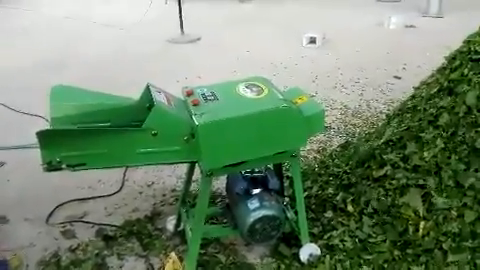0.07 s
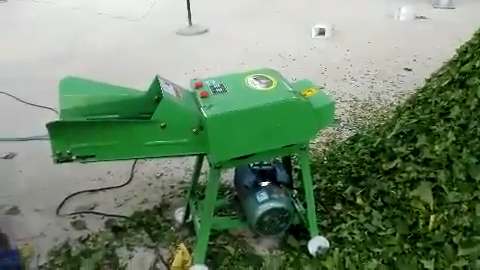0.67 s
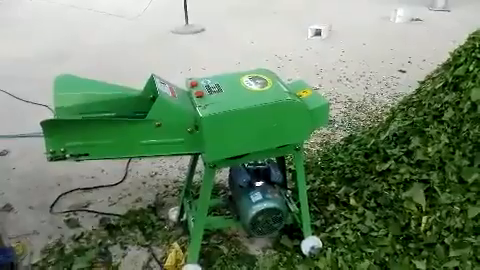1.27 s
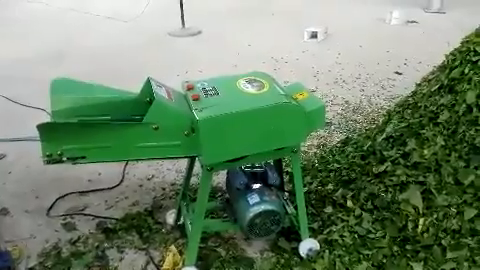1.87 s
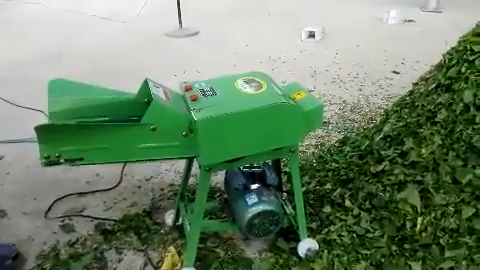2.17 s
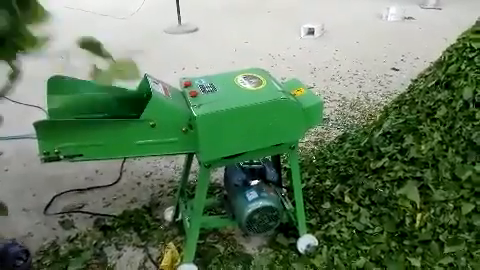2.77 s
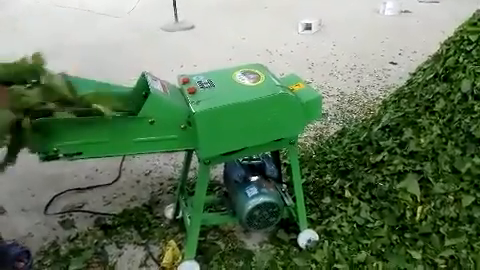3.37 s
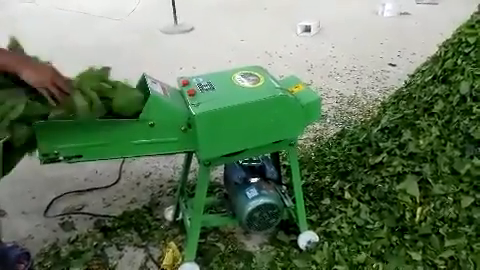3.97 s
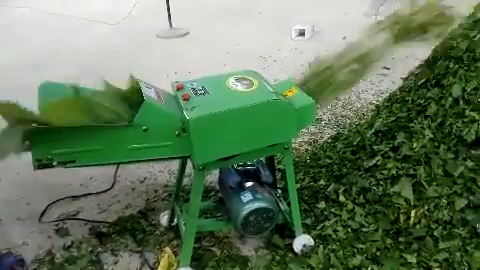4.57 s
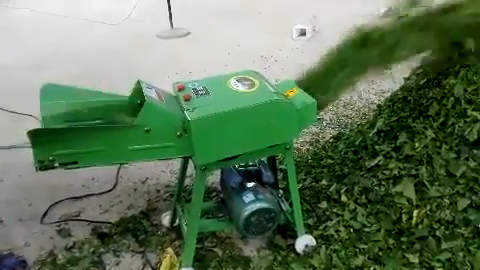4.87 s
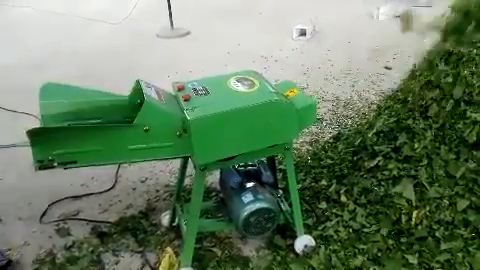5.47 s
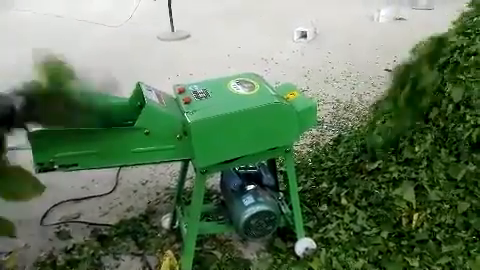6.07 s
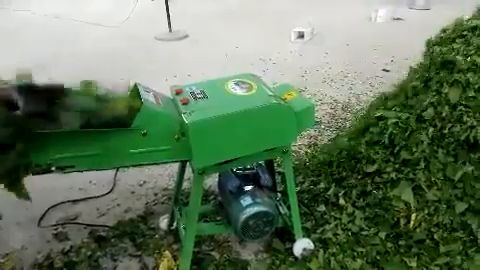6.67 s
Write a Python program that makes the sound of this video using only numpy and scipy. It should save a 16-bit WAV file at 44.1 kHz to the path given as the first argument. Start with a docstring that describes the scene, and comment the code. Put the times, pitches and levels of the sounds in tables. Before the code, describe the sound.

An electric chaff cutter drones and rattles, surging as it shreds leaves, chops hard stalks and sprays out the pieces.

```python
"""An electric chaff cutter runs in a concrete yard: its three-armed rotor drones, the motor hums and the
housing rattles. From 1.3 s leaves are shredded and sprayed out of the spout, and two wads thump through.
At 4.1 s hard stalks scrape in; the knives slow as they chop, then pick up speed while thick stems knock
on the bed plate. More leaves follow, and a second bundle of stalks bites at 6.5 s.
A small recorder stands close by; its right channel is muffled."""
import sys
import numpy as np
from scipy import signal
from scipy.fft import rfft, irfft, next_fast_len
from scipy.io import wavfile
from scipy.ndimage import map_coordinates

SR = 44100
rng = np.random.default_rng(int(sys.argv[2]) if len(sys.argv) > 2 else 0)


def generate_wav(signal):
    """Clip the signal to [-1, 1] and save it as 16-bit WAV at the path in sys.argv[1]."""
    frames = np.transpose(np.atleast_2d(signal))
    scaled = np.clip(frames, -1, 1) * 32767
    pcm = np.round(scaled).astype(np.int16)
    wavfile.write(sys.argv[1], SR, pcm)


N = 295911

# Resonances of the sheet steel housing. Each row: pitch in Hz, width in Hz, relative level in dB.
HOUSING_MODES = [(396, 83, 2.5), (775, 264, -1.5), (975, 170, -5.5), (1336, 42, 2), (1580, 330, -2.5),
                 (2228, 99, -3.5), (2430, 170, -7), (3500, 810, -13.5), (4640, 400, -15.5)]
# Resonances of the knives and bed plate. Each row: pitch in Hz, width in Hz, relative level in dB.
STEEL_MODES = [(686, 23, -10), (945, 59, -2.5), (1043.6, 29, 4), (1236, 33, -0.5), (2234, 31, -0.5),
               (2490, 60, -4), (2957, 38, -7), (3410, 67, -22), (3776, 130, -10.5), (4520, 210, -11.5)]
# Bundles of hard stalks. Each row: start and length in seconds, then ring, thud and scrape levels in dB.
STALK_BUNDLES = [(4.127, 1.006, -18.5, -18, -25.5), (6.505, .6, -20, -24, -32)]


def amp(db):
    """Decibels to gain."""
    return 10 ** (np.asarray(db) / 20)


def unit(x):
    """Scale to rms 1."""
    return x / np.sqrt(np.mean(x ** 2) + 1e-20)


def since(start):
    """Seconds since a moment, per sample."""
    return np.arange(N) / SR - start


def curve(rows):
    """An automation line through (seconds, value) points."""
    return np.interp(since(0), *np.transpose(rows))


def wobble(rate):
    """A smooth random curve, rate knots a second."""
    coarse = np.arange(0, N + 64, 64)
    knots = rng.standard_normal(int(N * rate / SR) + 4)
    return np.interp(np.arange(N), coarse, map_coordinates(knots, [coarse * rate / SR]))


def grains(rate, spread_db):
    """Tiny impacts of uneven size at random moments, rate a second."""
    hit = rng.random(N) < rate / SR
    return unit(hit * rng.choice([-1, 1], N) * amp(spread_db * np.clip(rng.standard_normal(N), -2, 2)))


def filtered(x, response):
    """x through a complex frequency response."""
    size = next_fast_len(N + SR // 2)
    return irfft(rfft(x, size) * response(np.fft.rfftfreq(size, 1 / SR)), size)[..., :N]


def coloured(x, points):
    """x through an EQ curve of (Hz, dB) points, at rms 1."""
    points_hz, db = np.transpose(points)
    return unit(filtered(x, lambda hz: amp(np.interp(np.log(hz + 1), np.log(points_hz), db))))


def ringing(force, modes):
    """A force through (Hz, width in Hz, dB) resonances of alternating polarity, at rms 1."""
    def response(hz):
        return sum((-1) ** k * amp(db) * 1j * hz * width / (pitch ** 2 - hz ** 2 + 1j * hz * width)
                   for k, (pitch, width, db) in enumerate(modes))
    return unit(filtered(force, response))


def surge(start, db, rise_s, hold_s, fade_db_per_s, bite_db):
    """Gain of a load that catches in 14 ms, builds from bite_db below its peak, holds and fades."""
    t = since(start)
    build_db = -bite_db * np.clip(1 - t / rise_s, 0, 1)
    fade_db = -fade_db_per_s * np.maximum(t - rise_s - hold_s, 0)
    return np.clip(t / .014, 0, 1) * amp(db + build_db + fade_db)


def drone(leaves, stalks, wad):
    """Three arms beat the air, harder under load; the motor's hum beats against the rotor's tones."""
    # The rotor labours a little on the wads. Each row: time in seconds, turns a second.
    rotor_speed = [(0, 52.9), (1.25, 52.8), (1.6, 51.9), (1.8, 52.4), (2.1, 52.8), (2.8, 53.15),
                   (4.7, 53.15), (5.4, 52.9), (5.7, 52.6), (6.3, 52.7), (6.71, 52.5)]
    # The arm tone swells, then beats slowly. Each row: time in seconds, level in dB.
    arm_levels = [(0, -39), (1.75, -40), (2.3, -36), (2.6, -34.5), (4.5, -33), (5.38, -34.5), (5.63, -42),
                  (5.83, -36), (6.01, -45), (6.29, -36), (6.54, -43), (6.71, -35)]
    # The casing's low boom swells and ebbs. Each row: time in seconds, level change in dB.
    boom_levels = [(0, -8.5), (1.1, -11), (1.8, -3), (2.9, 1), (4, -1.5), (5.1, -4.5), (5.6, -12.5),
                   (6.2, -5), (6.71, -10.5)]
    # A thin whine fades early on. Each row: time in seconds, level in dB.
    whine_levels = [(0, -39), (.75, -39), (1.05, -49), (6.71, -45.5)]
    # The rotor's weaker tones. Each row: multiple of the turn rate, base level in dB.
    overtones = [(1, -64), (2, -51), (4, -56.5), (5, -44.5), (7, -45.5), (9, -49.5), (11, -71), (18, -46),
                 (20, -46)]
    # The motor's magnetic hum. Each row: pitch in Hz, base level in dB, dB gained per dB of boom.
    hum_tones = [(102.8, -49, 0.8), (209.2, -48.5, 0.2), (270, -41, 1.1)]
    arm_db, boom_db, whine_db = curve(arm_levels), curve(boom_levels), curve(whine_levels)
    angle = 2 * np.pi * np.cumsum(curve(rotor_speed)) / SR

    def tone(phase, db):
        return np.sqrt(2) * amp(db) * np.sin(phase + rng.uniform(0, 2 * np.pi))

    def shaft(order, db, load=0):
        return np.hypot(amp(db), load) * tone(order * angle, 0)

    arms = shaft(order=3, db=arm_db, load=amp(-2.5) * wad)
    arms += shaft(order=6, db=-31 + 1.13 * boom_db, load=amp(5.5) * wad + amp(-12) * stalks)
    eighth_db = -35 + .52 * (whine_db - whine_db.mean())
    whine = shaft(order=8, db=eighth_db, load=amp(-22.5) * stalks + amp(-15.5) * leaves)
    whine += shaft(order=12, db=whine_db)
    # only the low overtones share the casing's boom
    weak = sum(tone(order * angle + .31 * wobble(7), db + .31 * boom_db * (order < 8) + .77 * wobble(12))
               for order, db in overtones)
    hum = sum(tone(2 * np.pi * hz * since(0) + .16 * wobble(2.2), db + share * boom_db)
              for hz, db, share in hum_tones)
    # The casing's low air resonances. Each row: pitch in Hz, width in Hz, relative level in dB.
    cavity_modes = [(258, 53, 7), (383, 86, 10.5)]
    turbulence = amp(boom_db - 35) * ringing(rng.standard_normal(N), cavity_modes)
    return arms + amp(1.9 * wobble(6.8)) * whine + weak + hum + turbulence


def knife_passes():
    """Running count of knife passes."""
    # The drum slows under load, then recovers. Each row: time in seconds, cuts a second.
    cut_rate = [(0, 79.2), (4.1, 79), (4.3, 75.4), (4.5, 75), (4.75, 76.2), (5.1, 78.5), (6.71, 78.5)]
    return np.cumsum(curve(cut_rate)) / SR


def running_noise():
    """Air rushes and loose panels rattle; a dry rub swells once in each turn of the four-knife drum."""
    # Air rushing round the empty rotor. Each row: frequency in Hz, relative level in dB.
    air_eq = [(25, -33), (70, -22.5), (130, -12.5), (220, -11.5), (370, -1), (520, -3), (900, 1),
              (1500, -5.5), (1900, -9.5), (4400, -14.5), (5300, -16), (7000, -30), (10200, -26),
              (13000, -28)]
    # The drum's dry rasp. Each row: pitch in Hz, width in Hz, relative level in dB.
    rasp_modes = [(2340, 56, -14), (2880, 690, -5), (3770, 370, 1), (4440, 300, 0.5), (5500, 610, -8.5),
                  (6270, 510, -4), (7244, 270, -5.5), (10080, 240, -14), (12800, 2000, -30)]
    air = amp(-28.5 + .15 * wobble(15)) * coloured(grains(rate=9000, spread_db=1), air_eq)
    rattle = amp(-34 + .44 * wobble(9.2)) * ringing(grains(rate=700, spread_db=6), HOUSING_MODES)
    cut_phase = 2 * np.pi * knife_passes()
    swell = amp(-3.2 * signal.sawtooth(cut_phase / 4) + np.cos(cut_phase))  # catches fast, eases off
    rub = amp(-35) * ringing(swell * rng.standard_normal(N), rasp_modes)
    return air + rattle + rub


def leaf_load():
    """Gains of tearing and spray as leaves reach the rotor; the fullest bunch sets each."""
    # Bunches of leaves. Each row: start and rise in seconds, tear and spray levels in dB,
    # tear and spray fades in dB a second.
    bunches = [(1.302, 0.042, -22, -29, 16, 59), (1.485, 0.12, -17, -22.5, 27.5, 68),
               (2.08, 0.12, -23, -34, 28.5, 48), (4.111, 0.16, -19, -24.5, 15, 27),
               (4.9, 0.073, -23, -30.5, 26, 23), (5.35, 0.13, -23.5, -27, 27, 53),
               (5.84, 0.092, -25, -27, 23, 43), (6.32, 0.074, -25.3, -31.5, 28, 41),
               (6.52, 0.1, -20, -26, 21, 40)]
    spout_delay_s = .02  # the chaff's travel time
    tears, sprays = [], []
    for start, rise, tear_db, spray_db, tear_fade, spray_fade in bunches:
        tears.append(surge(start, tear_db, rise, hold_s=.03, fade_db_per_s=tear_fade, bite_db=7))
        sprays.append(surge(start + spout_delay_s, spray_db, rise,
                            hold_s=.008, fade_db_per_s=spray_fade, bite_db=8))
    return np.max(tears, axis=0), np.max(sprays, axis=0)


def shredding(tear_gain, spray_gain):
    """The rotor tears leaves in a dense crackle, pelts the panels and blows the wet pieces out."""
    # Tearing leaves. Each row: frequency in Hz, relative level in dB.
    tear_eq = [(60, -31), (150, -12.5), (330, -1.5), (520, -3), (750, 1), (1400, -0.5), (2000, -0.5),
               (2800, -0.5), (3500, -1.5), (4400, -6.5), (5500, -10.5), (7500, -19), (14000, -32.5)]
    # Chaff hissing out of the spout. Each row: frequency in Hz, relative level in dB.
    spray_eq = [(300, -18), (2000, 11), (6500, 9.5), (10000, 0.5), (14000, 1.5)]
    tear = coloured(grains(rate=8000, spread_db=4), tear_eq)
    pelt = ringing(np.diff(grains(rate=1500, spread_db=4.5), prepend=0), HOUSING_MODES)
    spray = coloured(grains(rate=11000, spread_db=1.5), spray_eq)
    return tear_gain * amp(.94 * wobble(30)) * (tear + amp(-12) * pelt) + spray_gain * spray


def wad_load():
    """Gains of the wads' brief thumps and of their push on the rotor's tones."""
    # Wads of leaves. Each row: centre in seconds, thump in dB, half length in seconds, push in dB.
    wads = [(1.336, -23.5, 0.018, -32.5), (1.587, -25, 0.037, -26.5)]
    thump, push = 0, 0
    for centre, thump_db, half_length, push_db in wads:
        bell = np.exp(-.5 * (since(centre) / half_length) ** 2)
        thump += amp(thump_db) * bell
        push += amp(push_db) * bell
    return thump, push


def wad_thumps(gain):
    """A clump caught by the arms drums briefly on the casing."""
    # The body of the thump. Each row: frequency in Hz, relative level in dB.
    thump_eq = [(50, -39), (110, -19), (160, 7), (230, 6.5), (310, 4), (500, -9.5), (1100, 8.5),
                (2500, -52), (8000, -53)]
    return gain * coloured(grains(rate=2500, spread_db=2), thump_eq)


def stalk_scrape():
    """The first stalks of a bundle slip along a steel edge and make it sing briefly."""
    # The edge's resonances. Each row: pitch in Hz, width in Hz, relative level in dB.
    edge_modes = [(2930, 80, 0), (3440, 43, 1)]
    gain = sum(surge(start, db, rise_s=.06, hold_s=.044, fade_db_per_s=78, bite_db=12)
               for start, *_, db in STALK_BUNDLES)
    return gain * ringing(grains(rate=3300, spread_db=2.5), edge_modes)


def stalk_load():
    """Gains of the chopping: the steel rings first, then the thick of the bundle thuds and thins out."""
    ring, thud = 0, 0
    for start, length, ring_db, thud_db, _ in STALK_BUNDLES:
        run_out = amp(-79 * np.maximum(since(start + length), 0))  # quick release at the bundle's end
        ring += run_out * surge(start, ring_db, rise_s=.11, hold_s=.04, fade_db_per_s=13.7, bite_db=11)
        thud += run_out * surge(start, thud_db, rise_s=.21, hold_s=.04, fade_db_per_s=12, bite_db=15.5)
    return ring, thud


def chopping(ring_gain, thud_gain):
    """Each knife pass thuds into the bundle, and its short crunch rings the steel."""
    # A knife's blow on the bundle. Each row: frequency in Hz, relative level in dB.
    knock_eq = [(40, -54), (140, -18.5), (228, -9), (302, -2), (378, 2), (455, -1), (540, -9), (720, -1.5),
                (1000, -6), (1500, -6.5), (3000, -18.5), (8000, -42)]
    passes = knife_passes()
    cut = passes.astype(int)
    strength = amp(2.4 * np.clip(rng.standard_normal(cut[-1] + 1), -2, 2))[cut]
    blows = unit(np.diff(cut, prepend=0) * strength)

    def crunch(decay_passes):
        return unit(strength * np.exp(-(passes % 1) / decay_passes) * grains(rate=5000, spread_db=2))

    ring = ringing(.5 * blows + crunch(decay_passes=.55), STEEL_MODES)
    thud = coloured(blows + crunch(decay_passes=.6), knock_eq)
    return ring_gain * ring + thud_gain * thud


def stem_snaps():
    """A thick stem snaps in one dull blow and a short crack that ring the steel."""
    # Stems knocking on the bed plate. Each row: start in seconds, relative level in dB.
    stems = [(4.5596, -21), (4.6065, -20.5), (4.7846, -20), (4.8629, -20.5), (4.9771, -22), (5.029, -26),
             (5.0789, -16.5), (5.1039, -19.5)]
    decay_s, lowpass_hz = .005, 1500
    force, t = np.zeros(N), np.arange(SR // 20) / SR
    for start, db in stems:
        crack = .074 * rng.standard_normal(len(t)) * np.exp(-t / decay_s)
        crack[0] += 1  # the blow
        force[round(start * SR):][:len(t)] += amp(db) * crack
    dulled = filtered(force, lambda hz: 1 / (1 + 1j * hz / lowpass_hz) ** 2)
    ring = ringing(dulled, STEEL_MODES)
    peak_db = 6 + max(db for _, db in stems)
    return amp(peak_db) * ring / np.abs(ring).max()


def yard(x, t60, wet_db):
    """Floor and walls scatter each impact into a short tail."""
    t = np.arange(SR // 2) / SR
    tail = rng.standard_normal(len(t)) * amp(-60 * t / t60) * (t > .003)
    return x + amp(wet_db) * signal.fftconvolve(x, tail / np.linalg.norm(tail))[:N]


def scene():
    """The loads drive the machine; it reaches the microphone alike on both channels."""
    tear, spray = leaf_load()
    thump, push = wad_load()
    ring, thud = stalk_load()
    impacts = running_noise() + stalk_scrape() + chopping(ring, thud) + stem_snaps()
    impacts += shredding(tear, spray) + wad_thumps(thump)
    sound = drone(leaves=tear, stalks=thud, wad=push) + yard(impacts, t60=.34, wet_db=-10.5)
    return np.array([sound, sound])


def record(dry):
    """Peaks are rounded off, the right channel is dull and late, and a treble band and the top are cut."""
    ceiling, muffle_hz, lag_s = .85, 295, .00053
    gap_low_hz, gap_high_hz, top_hz = 7650, 9450, 14400
    left, right = dry / (1 + (dry / ceiling) ** 8) ** (1 / 8)
    right = filtered(right, lambda hz: np.exp(-2j * np.pi * hz * lag_s) / (1 + 1j * hz / muffle_hz))
    passband = lambda hz: ((hz < gap_low_hz) | (hz > gap_high_hz)) & (hz < top_hz)
    return filtered(np.array([left, right]), passband)


dry = scene()
out = record(dry)
generate_wav(out)
```